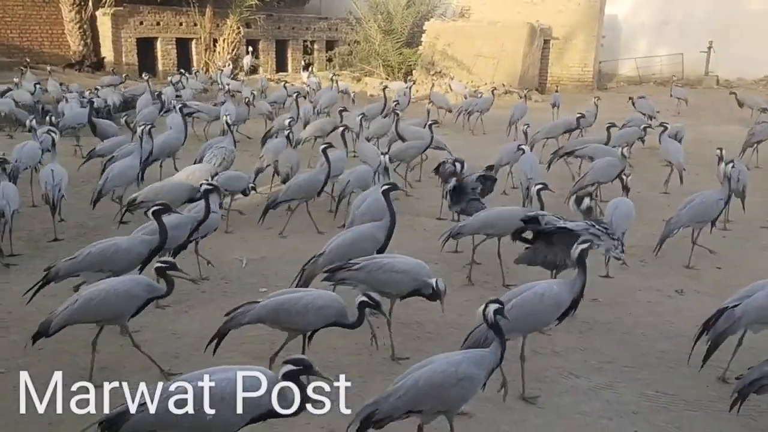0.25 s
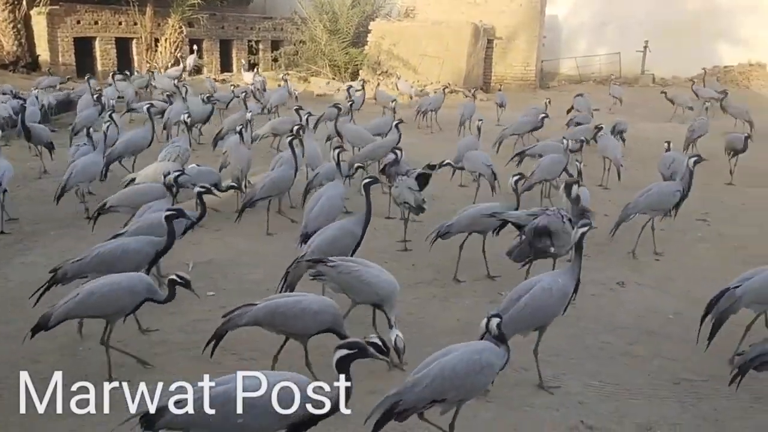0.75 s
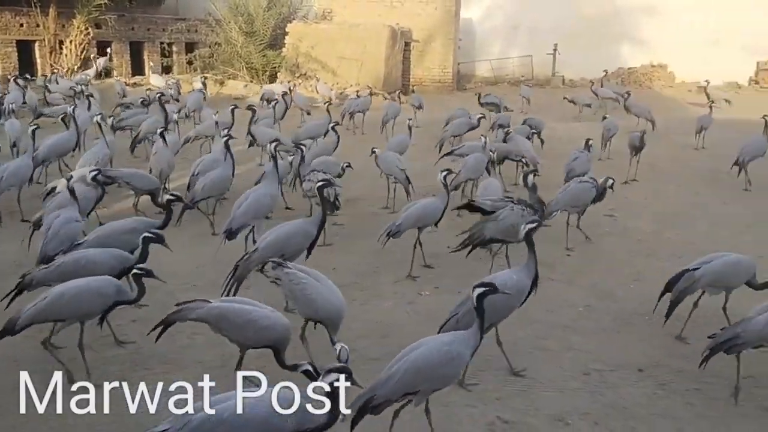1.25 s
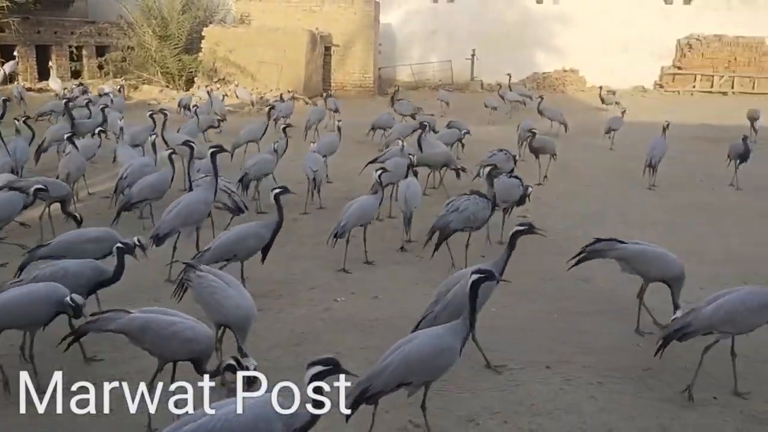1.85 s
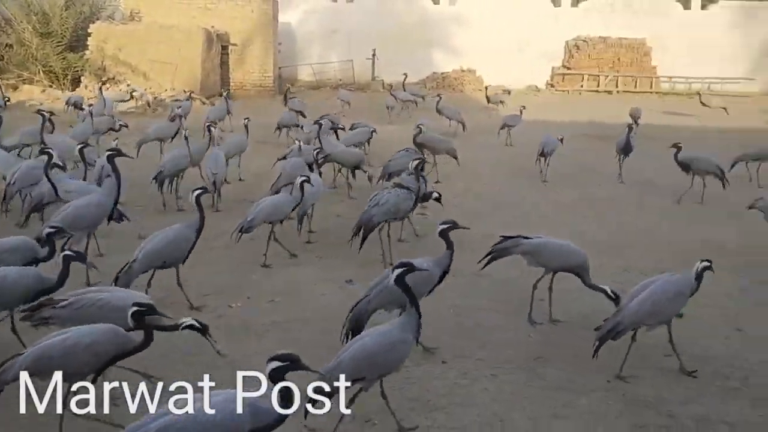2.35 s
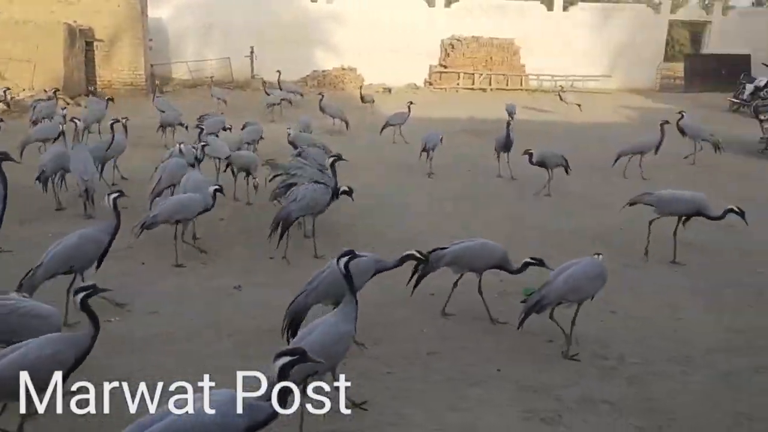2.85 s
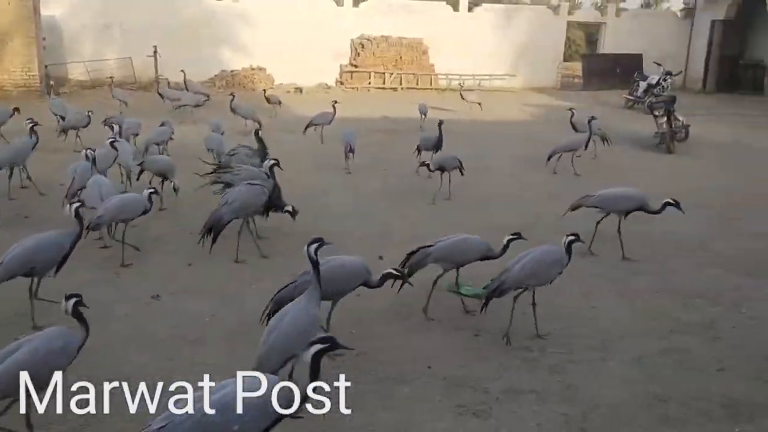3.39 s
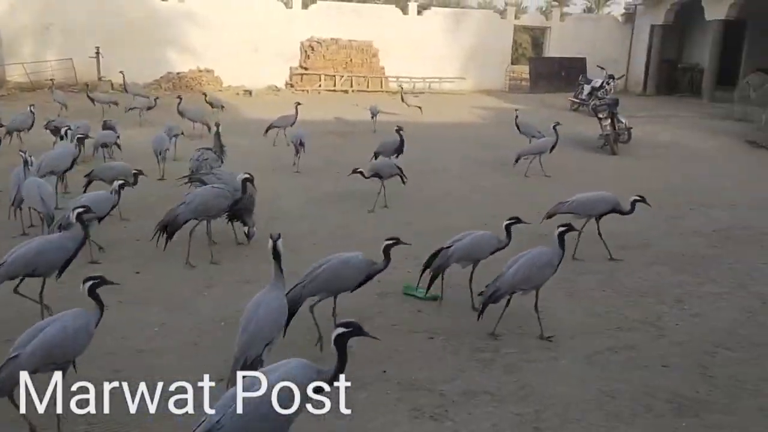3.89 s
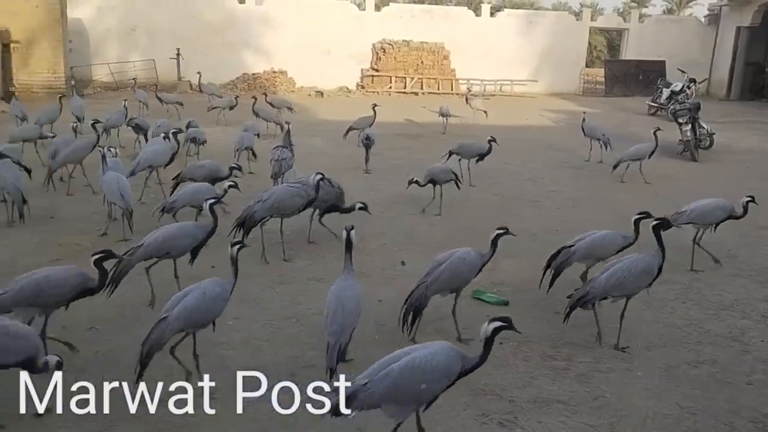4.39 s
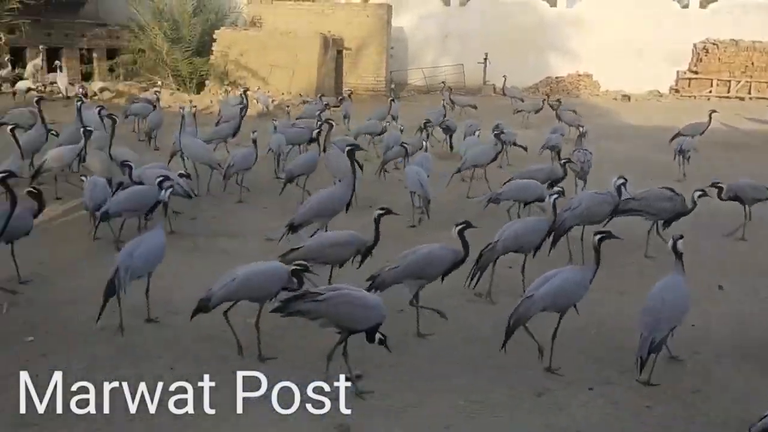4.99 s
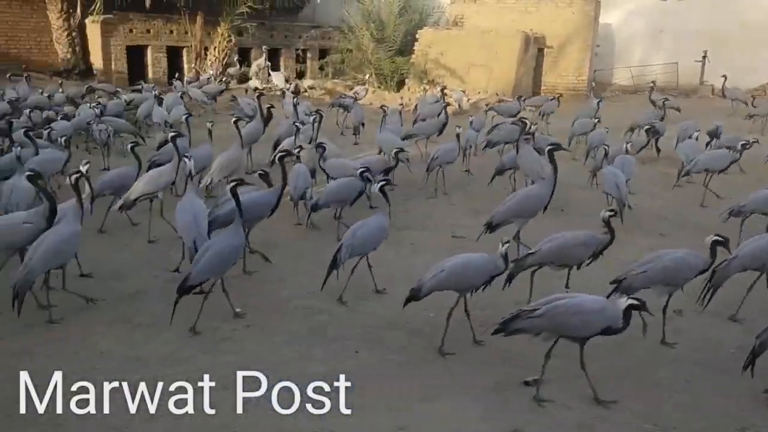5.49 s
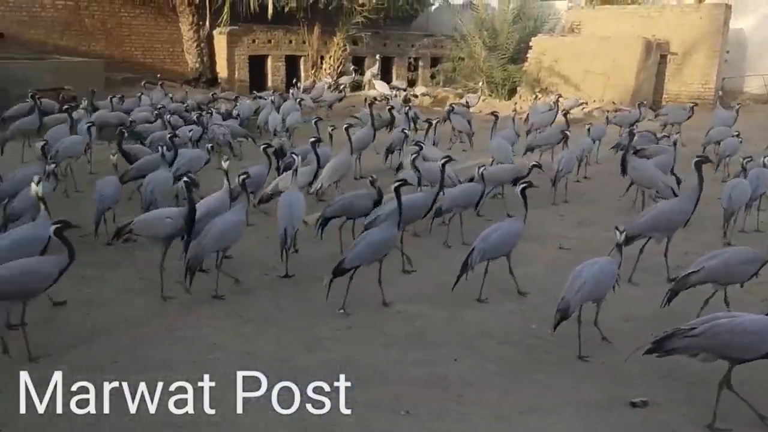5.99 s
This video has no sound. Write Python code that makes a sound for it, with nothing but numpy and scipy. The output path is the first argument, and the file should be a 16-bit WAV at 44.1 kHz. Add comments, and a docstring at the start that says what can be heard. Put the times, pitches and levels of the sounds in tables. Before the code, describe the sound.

Continuous crane clamour, outdoors among walls. Nasal, reedy cries of a tenth to a third of a second follow one another, some lower and hollow, some higher and raspy. Stuttering barks, about thirty a second, break in from the nearest birds. The distant flock swells and thins behind them, over quiet low rustle of feet and wings. Close stereo pickup, birds mostly to the right, light diffuse echo.

```python
"""A walled earth courtyard, with a big flock of demoiselle cranes calling close to two microphones.
Each near cry is a gliding tone with overtones, chopped into a fast rattle by the puffs of the syrinx.
The nearest birds also stutter in short barks: bursts of the same voice that sag in pitch.
Dozens of random cries merge into a far chorus; noise makes the low shuffle of the yard.
The walls answer the near birds with a decaying diffuse tail."""
import sys
import numpy as np
from scipy import signal
from scipy.fft import rfft, irfft, next_fast_len
from scipy.io import wavfile
from scipy.ndimage import uniform_filter1d, minimum_filter1d, map_coordinates

SR = 44100
rng = np.random.default_rng(int(sys.argv[2]) if len(sys.argv) > 2 else 0)


def wrap_up_sound(samples):
    """Save the sound to the file named by the first command line argument, as 16-bit audio."""
    columns = np.atleast_2d(samples).T
    # keep every value between -1 and 1, then stretch to whole-number steps
    tamed = np.clip(columns, -1, 1)
    steps = np.round(tamed * 32767).astype(np.int16)
    wavfile.write(sys.argv[1], SR, steps)


N = 275184


def amp(db):
    """Decibels to gain."""
    return 10 ** (np.asarray(db) / 20)


def unit(x):
    """Scale to rms 1."""
    return x / np.sqrt(np.mean(x ** 2) + 1e-20)


def along(points, hz):
    """(Hz, value) points read on a log frequency axis."""
    point_hz, value = np.transpose(points)
    return np.interp(np.log(hz + 1), np.log(point_hz + 1), value)


def curve(rows):
    """(s, value) rows as one value per sample."""
    return np.interp(np.arange(N) / SR, *np.transpose(rows))


def wobble(n, rate_hz):
    """Smooth random curve of n samples, rate_hz knots a second."""
    knots = rng.standard_normal(int(n * rate_hz / SR) + 4)
    return map_coordinates(knots, [np.arange(n) * rate_hz / SR + 1])


def filtered(x, response):
    """x times a response of frequency."""
    n = x.shape[-1]
    m = next_fast_len(n + 512)
    spectrum = rfft(x, m) * response(np.fft.rfftfreq(m, 1 / SR))
    return irfft(spectrum, m)[..., :n]


def coloured(x, points):
    """x through a (Hz, dB) spectrum, at rms 1."""
    return unit(filtered(x, lambda hz: amp(along(points, hz))))


# Low tones reach the two microphones more nearly together.
# Each row: frequency in Hz, share of the nominal lag.
LAG_SHARE_BY_HZ = [(750, 0.77), (1250, 0.98), (2200, 1.074), (5000, 1.054)]


def add(out, sound, start_s, lag_ms, ground_gain=.25):
    """Place a sound and its ground bounce; its bearing sets the lag of the left microphone behind the right."""
    bounce_s = rng.uniform(0.00218, 0.009)

    def response(hz):
        bounce = 1 + ground_gain * np.exp(-2j * np.pi * hz * bounce_s)
        lag_s = along(LAG_SHARE_BY_HZ, hz) * lag_ms / 1000
        # half the lag each way: left later, right earlier
        return bounce * np.exp(np.outer([-1, 1], 1j * np.pi * hz * lag_s))

    pair = filtered(sound, response)
    start = round(start_s * SR)
    pair = pair[:, max(-start, 0):max(N - start, 0)]
    out[:, max(start, 0):][:, :pair.shape[1]] += pair


def syrinx(pitch_hz, rough, rattle_hz=122, puff_decay_cycles=0.545, chirp=.1, shimmer_db=4, catch_db=2):
    """Phase and strength of the membranes' vibration, which comes in nearly regular rattling puffs."""
    scatter, jitter, tremble, waver = .22, .038, .008, .014
    n = len(pitch_hz)
    rate_hz = rattle_hz * np.exp(.1 * rng.normal() + scatter * rough ** 2 * wobble(n, 89.55))
    cycle = np.cumsum(rate_hz) / SR % 1
    puff = unit((1 - np.exp(-cycle / 0.1533)) * np.exp(-cycle / puff_decay_cycles) * (1 - cycle ** 4))
    depth = min(1, 2.198 * rough)
    flicker_db = shimmer_db * rough * wobble(n, 248.4) + catch_db * wobble(n, 70.4)
    strength = unit((1 - depth + depth * puff) * amp(flicker_db))
    # pitch rides on the pressure of each puff
    bend = chirp * depth * (puff - 1.1)
    # jitter grows with roughness
    bend += jitter * rough ** 2 * wobble(n, 597.8)
    bend += tremble * wobble(n, 129.0) + waver * wobble(n, 44.96)
    return 2 * np.pi * np.cumsum(pitch_hz * (1 + bend)) / SR, strength


# Pass band of the long windpipe. Each row: frequency in Hz, relative level in dB.
WINDPIPE_DB = [(400, -30), (700, -4.5), (850, -25), (1050, -31), (1400, 11), (1700, 12), (2200, -2),
               (2500, -47), (2800, -11), (3200, -3), (4000, -26)]
# Tone filter of the beak. Each row: frequency in Hz, gain in dB.
BEAK_DB = [(60, -80), (250, -56), (450, -18.5), (620, -5.5), (780, -6), (2500, -2.5), (2900, -10.5),
           (3250, -31), (4000, -0.5), (8000, -13)]
# Spectrum of the rasp. Each row: frequency in Hz, relative level in dB.
RASP_DB = [(2000, -100), (2900, -7), (3300, -11), (3650, -9), (4300, -7.5), (5100, -7.5), (6000, -14.5),
           (7000, -17.5), (8000, -28), (10000, -43.5)]
# Spectrum of the hiss. Each row: frequency in Hz, relative level in dB.
HISS_DB = [(5000, -46), (6500, 7), (7800, -4.5), (9200, -2.5), (10500, 1), (13000, -3.5), (16000, -14)]


def voice(effort, pitch_hz, rough, levels_db, spike=0.31, uneven_db=3):
    """Three harmonics and a croak of air, with rasp and hiss growing faster with effort, all chopped by the syrinx."""
    croak_db, brighten, rasp_noise = -14, 1.5, 1.2
    *harmonics_db, rasp_db, hiss_db = levels_db
    phase, strength = syrinx(pitch_hz, rough)
    air = rng.standard_normal(len(pitch_hz))

    def harmonic(k):
        return np.sin(k * phase + rng.uniform(0, 2 * np.pi))

    tone = sum(amp(db) * harmonic(k) for k, db in enumerate(harmonics_db, 1))
    # in a harsh voice each puff also rings the windpipe
    croak = rough * amp(max(harmonics_db) + croak_db) * coloured(air, WINDPIPE_DB)
    tone = np.sqrt(2) * effort * strength * (tone + croak)
    tone = filtered(tone, lambda hz: amp(along(BEAK_DB, hz)))
    overtones = unit(sum(amp(uneven_db * rng.normal()) * harmonic(k) for k in range(3, 12)))
    pulsed_air = rasp_noise * air * (1 + .5 * np.cos(phase))
    chop = strength ** spike
    rasp = coloured(chop * (overtones + pulsed_air), RASP_DB)
    hiss = coloured(chop * air, HISS_DB)
    return tone + effort ** brighten * (amp(rasp_db) * rasp + amp(hiss_db) * hiss)


def cry(length_s, pitches_hz, rough, levels_db, hiss_below_rasp_db=15):
    """One call: it swells and fades while its pitch follows a parabola through three points."""
    u = np.linspace(0, 1, round(max(length_s, .03) * SR))
    pitch_hz = np.polyval(np.polyfit([0, .5, 1], pitches_hz, 2), u)
    effort = np.sqrt(np.abs(np.sin(np.pi * u)))
    return voice(effort, pitch_hz, rough, [*levels_db, levels_db[-1] - hiss_below_rasp_db])


# Cries of the close birds. Each row: start in seconds, end in seconds, pitch in Hz at the start,
# middle and end, roughness 0-1, level in dB of harmonics 1, 2 and 3, rasp in dB, nominal left lag in ms.
NEAR_CRIES = [(-.07, 0.117, 1560, 1530, 1124, 0.3, -15.5, -20.5, -54, -33, 0.52),
              (.094, 0.327, 853, 820, 787, 0.56, -26, -13, -27.5, -46, 0.27),
              (0.099, 0.248, 1377, 1273, 1114, 0.99, -18.5, -21, -44, -36.5, 0.58),
              (0.278, 0.42, 1242, 1229, 1110, .25, -15, -20.5, -32, -41, 0.29),
              (.389, .62, 1046, 1106, 1041, 0.93, -11, -16.5, -7.5, -29, 0.47),
              (.391, .563, 798.6, 856.5, 786, 0.83, -13.5, -12.5, -19.5, -27, 0.43),
              (.551, 0.673, 822, 784, 807, 0.28, -20, -21.5, -27, -37.5, 0),
              (.656, 0.813, 895, 884, 760, 0.16, -17, -35, -47, -48.5, .02),
              (0.672, 0.794, 1133, 1140, 960, 0.41, -20, -42, -42, -63, 0.71),
              (.759, 0.93, 771, 784, 780, 0.16, -34, -12, -36, -56, .32),
              (0.803, 0.9, 985, 985, 944, 0.22, -40, -17.5, -43, -50, 0.6),
              (0.822, 0.932, 1149, 1268, 1220, .4, -51, -24.5, -38, -42, .02),
              (1.055, 1.131, 1350, 1259, 1185, 0.51, -17, -28, -58, -35.5, 0.31),
              (1.155, 1.22, 804, 768, 752, .25, -16, -14.5, -28, -30.5, 0.23),
              (1.227, 1.354, 1392, 1347, 1169, 0.59, -9.5, -22, -46, -34, 0.43),
              (1.33, 1.459, 899, 832, 758, .55, -21, -18, -32.5, -32, 0.46),
              (1.431, 1.51, 760, 769, 735, .6, -19, -16, -20.5, -31, 0.46),
              (1.449, 1.695, 1005, 955, 860, 0.73, -21, -49, -56, -42, 0.45),
              (1.729, 1.928, 1071, 1178, 1088, 0.53, -10.5, -13.5, -27, -34.5, .48),
              (1.908, 2.027, 1248, 1327, 1297, 0.78, -14, -22.5, -35.5, -36, .25),
              (1.928, 2.053, 740, 749, 812, 0.16, -20.5, -24, -23, -46, 0),
              (1.97, 2.076, 1650, 1632, 1593, 0.084, -17.5, -36, -48, -61, 0.18),
              (2.048, 2.268, 1145, 1075, 1006, .85, -25.5, -28, -50, -34, -.1),
              (2.277, 2.441, 1096, 1081, 923, 0.73, -9, -18, -28, -33.5, 0.53),
              (2.421, 2.716, 880, 856.4, 831, 0.67, -19.5, -20.5, -33, -32, 0.46),
              (2.698, 2.829, 910, 885, 877, 0.247, -51, -25.5, -29.5, -55, 0.4),
              (2.791, 3.072, 1230, 1168, 1046, 0.69, -13.5, -16, -53, -33, 0.52),
              (3.017, 3.158, 926, 832, 740, 0.57, -28, -16.5, -33, -31.5, .54),
              (3.141, 3.26, 736, 785, 753, 0.21, -25, -16, -22.5, -29.5, 0.45),
              (3.165, 3.328, 1422, 1339, 1077, 0.73, -8, -10.5, -45, -30.5, 0.58),
              (3.291, 3.433, 1343, 1302, 1214, 0.91, -10.5, -19.5, -57, -37.5, 0.47),
              (3.404, 3.618, 1148, 1218, 1115, 0.38, -11.5, -20, -39, -32.5, 0.6),
              (3.574, 3.671, 750, 788, 825, 0.3, -19.5, -25, -20, -29.5, 0.32),
              (3.667, 3.774, 812, 798, 700, 0.23, -17, -28, -32, -36.5, 0.36),
              (3.875, 4.021, 782, 799.4, 746, 0.42, -20, -13.5, -18.5, -34.5, 0.53),
              (3.979, 4.158, 1029, 1083, 1110, 0.96, -16.5, -21.5, -15, -37, 0.34),
              (4.018, 4.17, 817.5, 790, 712, 0.3, -24, -22.5, -21.5, -35.5, 0.22),
              (4.056, 4.14, 443, 393, 392, 0.086, -16.5, -40, -50, -60, 0.6),
              (4.28, 4.529, 1121, 1139, 1116, 0.77, -22, -22, -40, -33, 0.54),
              (4.39, 4.554, 932, 903, 860, 0.49, -26.5, -29, -42, -35.5, 0.37),
              (4.508, 4.682, 948, 982, 928, 0.79, -23, -20.5, -39, -32, 0.583),
              (4.529, 4.699, 1330, 1365, 1237, 0.73, -17, -27, -34, -53, 0.53),
              (4.629, 4.829, 1039, 1092, 1022, 0.231, -12.5, -27, -42, -28, 0.585),
              (4.66, 4.795, 1150, 1152, 1104, 0.433, -14, -16.5, -42, -25.5, 0.542),
              (4.691, 4.868, 1030, 1022, 963, 0.86, -41, -19.5, -28, -31.5, 0.45),
              (4.779, 4.902, 1303, 1283, 1240, 0.37, -14, -16.5, -49, -25.5, 0.49),
              (4.869, 5.0, 1203, 1189, 1120, 0.72, -17.5, -18.5, -45, -30, .5),
              (4.891, 5.073, 788, 751, 778, 0.339, -25, -16, -33, -36, 0.43),
              (5.06, 5.197, 944, 862.6, 816, 0.68, -21, -12.5, -23.5, -33, 0.27),
              (5.066, 5.198, 1270, 1322, 1260, 0.66, -23.5, -20, -37, -34, .41),
              (5.191, 5.288, 741.4, 790.6, 836, 0.37, -19, -10, -24, -31, 0.42),
              (5.341, 5.418, 831, 797, 760, 0.22, -16.5, -19.5, -35, -35, 0.46),
              (5.4, 5.55, 789, 770, 752, 0.26, -35.5, -39, -34.5, -46, -0.34),
              (5.688, 5.788, 779, 801, 762, 0.71, -19, -16.5, -25, -25.5, 0.34),
              (5.711, 5.884, 1146, 1151, 1050, 0.89, -12.5, -19.5, -28, -27, 0.48),
              (5.85, 6.027, 1031, 1013, 959, 0.61, -18.5, -25, -39, -34, 0.51),
              (6.02, 6.142, 1185, 1325, 1380, 0.29, -10.5, -16.5, -52, -43, .24),
              (6.04, 6.263, 1117, 1145, 1100, 0.58, -19, -17.5, -45, -36.5, 0.53),
              (6.146, 6.299, 1359, 1323, 1263, 0.66, -7, -19.5, -48, -32.5, 0.26),
              (6.159, 6.299, 890, 852, 843, 0.53, -44, -23, -32, -34.5, 0.54)]


def near_cries(stutter_hz=31, stutter_db=5.0):
    """The close birds: each cry breaks into beats more and more as it runs out, and ends in a dip."""
    out = np.zeros((2, N))
    for start_s, end_s, first_hz, middle_hz, last_hz, rough, *levels_db, lag_ms in NEAR_CRIES:
        sound = cry(end_s - start_s, [first_hz, middle_hz, last_hz], np.clip(rough, .1, 1), levels_db)
        t = np.arange(len(sound)) / SR
        beat = np.cos(2 * np.pi * stutter_hz * (t[-1] - t))
        stutter = amp(-stutter_db * t / t[-1] * beat)
        add(out, sound * unit(stutter), start_s, lag_ms)
    return out


def third_db(pitch_hz):
    """Third harmonic against the second: the windpipe passes it well only in a low voice."""
    return -9 if 3 * pitch_hz < 2900 else -24


# Level of the far birds. Each row: time in seconds, level in dB.
CHORUS_DB = [(0, -22), (1.4, -21.5), (1.7, -38), (1.85, -21), (2.0, -24.5), (2.55, -22.5), (2.75, -38.5),
             (3.0, -23.5), (3.55, -25.5), (3.8, -43), (4.05, -19), (4.28, -38), (4.55, -20), (5.15, -22.5),
             (5.45, -29.5), (5.65, -25.5), (6.24, -16.5)]


def far_flock(count=80, lowest_hz=780, highest_hz=1400, gain_db=0.0):
    """Many more birds cry at scattered times, each with a random pitch, harshness and bearing."""
    out = np.zeros((2, N))
    for i, (when, length, height, rough, bearing) in enumerate(rng.random((count, 5))):
        pitch_hz = lowest_hz * (highest_hz / lowest_hz) ** height
        glide_hz = pitch_hz * np.array([.98, 1.04, .9])
        levels_db = [0, -4, third_db(pitch_hz) - 4, -20]
        sound = cry(.12 + .14 * length, glide_hz, .36 + .4 * rough, levels_db)
        start_s = (i + when) / count * (N / SR + .2) - .2
        add(out, sound, start_s, .55 - 1.024 * bearing ** 2)
    return amp(curve(CHORUS_DB) + gain_db) * unit(out)


# Spectrum of the shuffle. Each row: frequency in Hz, relative level in dB per Hz.
RUMBLE_DB = [(15, -56), (25, -38), (54, -18), (141, 0.5), (184, 4.5), (211, 4.5), (317, -6), (400, -3),
             (520, -1), (880, -120)]
# Course of the shuffle. Each row: time in seconds, level in dB before the yard gain.
YARD_DB = [(0.0, -49.5), (0.76, -47.5), (1.79, -60.5), (2.4, -49), (3.02, -58), (3.35, -47.5), (3.5, -62),
           (4.01, -59), (4.1, -46), (4.27, -73), (4.41, -52), (6.24, -49)]


def yard(gain_db=-2.0, width=0.27, lumpy_db=2.5):
    """Low shuffle of feet, wings and air: coloured noise of unsteady level."""
    mid, side = coloured(rng.standard_normal((2, N)), RUMBLE_DB)
    level = amp(curve(YARD_DB) + gain_db + lumpy_db * wobble(N, 22))
    return level * np.array([mid + width * side, mid - width * side])


# Decay of the courtyard. Each row: frequency in Hz, time to fall 60 dB in seconds.
WALLS_T60_S = [(200, 0.52), (1500, 0.51), (5000, 0.26), (12000, 0.0047)]


def walls(x, delay_s=0.011):
    """The courtyard's diffuse answer: decaying noise, different at each microphone."""
    hz, t, z = signal.stft(rng.standard_normal((2, SR // 2)), SR, nperseg=256)
    decay = amp(-60 * t / along(WALLS_T60_S, hz)[:, None])
    tail = signal.istft(z * decay, SR, nperseg=256)[1]
    late = np.pad(x, ((0, 0), (round(delay_s * SR), 0)))
    return signal.fftconvolve(late, tail / np.linalg.norm(tail[0]), axes=1)[:, :N]


def bark(length_s, pitch_hz, levels_db, attack_s=0.0011, droop=0.0542, rough=0.56, rattle_after_s=0.017,
         ring=.1):
    """One syllable bursts open, sags in pitch and rings briefly; longer ones rattle, the shortest hardly."""
    t = np.arange(round(.06 * SR)) / SR
    fall = (1 - ring) * np.exp(-(t / length_s) ** 3) + ring * np.exp(-t / length_s)
    effort = (1 - np.exp(-t / attack_s)) * fall
    harshness = rough * min(1, length_s / rattle_after_s) ** 2
    sagging_hz = pitch_hz * (1 - droop * np.minimum(t / length_s, 2))
    return voice(effort, sagging_hz, harshness, levels_db)


# Barks of the nearest birds. Each row: start in seconds, decay length in seconds, pitch in Hz,
# level of harmonics 1 and 2 in dB, rasp in dB, levels before the bark gain.
NEAR_BARKS = [(.503, 0.023, 1116, -11, -15, -22), (.536, 0.015, 1126, -20, -15, -24),
              (.569, 0.014, 1055, -20, -16.5, -32), (.914, 0.01, 1537, -12.5, -21, -33),
              (.948, 0.0095, 1525, -9, -13, -30), (.981, 0.0079, 1490, -9.5, -11, -33),
              (1.013, 0.0075, 1487, -9, -10.5, -32.5), (1.046, 0.0048, 1400, -10.5, -22, -32),
              (1.117, 0.023, 942, -12.5, -12.5, -24.5), (1.159, 0.0047, 972, -9.5, -8, -19),
              (1.509, 0.024, 1093, -13, -18.5, -28.5), (1.54, 0.019, 1102, -17, -19, -30.5),
              (1.57, 0.01, 1097, -24, -16.5, -28), (1.604, 0.0087, 1095, -19, -14.5, -30.5),
              (1.636, 0.012, 1093, -34, -21, -34.5), (2.087, 0.022, 1373, -15, -16, -44),
              (2.12, 0.016, 1392, -16, -12.5, -34), (2.148, 0.019, 1355, -14.5, -13.5, -31.5),
              (2.179, 0.014, 1336, -15, -16, -40), (2.205, .013, 1325, -15, -14, -34),
              (2.446, 0.018, 926, -13.5, -13, -32), (2.474, .018, 905, -8, -9.5, -21.5),
              (2.507, 0.019, 885, -14, -13, -25.5), (2.54, 0.02, 880, -13, -15, -26.5),
              (2.572, 0.016, 879, -24, -15, -35), (2.889, 0.027, 1210, -16.5, -26, -24),
              (2.92, 0.027, 1285, -19, -17.5, -21.5), (2.952, 0.029, 1188, -16.5, -18, -18.5),
              (3.142, 0.012, 1460, -7.5, -10, -30), (3.662, 0.022, 986, -10.5, -13, -26.5),
              (3.68, 0.0078, 1241, -25, -7, -29), (3.703, 0.013, 1223, -27, -10, -29.5),
              (3.845, 0.01, 810, -21, -22.5, -44), (3.882, .024, 799, -25.5, -16.5, -33),
              (4.143, 0.02, 1195, -16, -12.5, -26), (4.174, 0.02, 1299, -12, -14, -24),
              (4.203, 0.017, 1288, -9.5, -12.5, -21), (4.232, 0.017, 1169, -10, -9.5, -20),
              (4.263, 0.019, 1120, -26, -17.5, -31.5), (4.35, 0.031, 1059, -18, -17, -34),
              (4.592, 0.011, 1365, -1, -21, -24), (5.26, 0.021, 843, -15, -23, -21),
              (5.303, 0.014, 1057, -10, -8.5, -17), (5.345, .013, 896, -12, -17, -22.5),
              (5.545, 0.027, 1460, -23, -20.5, -36), (5.582, 0.029, 1456, -16.5, -17.5, -37),
              (5.619, 0.021, 1427, -14, -25, -35.5), (5.64, 0.021, 904, -16.5, -14.5, -33),
              (5.673, 0.02, 918, -13, -14.5, -35), (5.703, 0.019, 892, -12, -12.5, -37),
              (5.767, 0.022, 1170, -31, -22, -26.5), (5.796, 0.015, 1180, -27, -13, -24.5)]
# Each run of barks comes from one bird.
# Each row: first moment in seconds, hiss over the rasp in dB, nominal left lag in ms.
BARK_RUNS = [(.4, -5.5, 0.33), (.85, -10, 0.55), (1.08, -15, 0.19), (1.45, -41, 0.49), (2.0, -18, -0.061),
             (2.4, -21, 0.56), (2.8, -10.5, .1), (3.1, -16, 0.57), (3.86, -19, 0.57), (4.1, -3.5, 0.517),
             (4.3, -24, 0.495), (4.5, -23, -0.31), (5.2, -44, .49), (5.5, -0.5, 0.4), (5.74, -1.5, -0.13)]


def barks(gain_db=1.5):
    """The nearest birds stutter in runs of short barks, about thirty a second."""
    out = np.zeros((2, N))
    for start_s, length_s, pitch_hz, first_db, second_db, rasp_db in NEAR_BARKS:
        _, hiss_db, lag_ms = [run for run in BARK_RUNS if run[0] <= start_s][-1]
        levels_db = [first_db, second_db, second_db + third_db(pitch_hz), rasp_db, rasp_db + hiss_db]
        add(out, bark(length_s, pitch_hz, levels_db), start_s, lag_ms)
    return amp(gain_db) * out


def scene(walls_db=-16):
    """Near birds, their echo, the far flock and the yard."""
    near = near_cries() + barks()
    return near + amp(walls_db) * walls(near) + far_flock() + yard()


def limiter(x, size=353, ceiling=.88):
    """Gain ducks smoothly around any peak above the ceiling; size in samples."""
    needed = ceiling / np.maximum(np.abs(x).max(axis=0), ceiling)
    held = minimum_filter1d(needed, 2 * size + 1)
    return x * uniform_filter1d(uniform_filter1d(held, size), size)


# Colour of the two microphones, split evenly. Each row: frequency in Hz, left minus right in dB.
MICS_DB = [(380, -.5), (700, -.5), (1290, 3.5), (2380, 5), (4400, -2.5), (8120, -3), (15000, 2.5)]


def record(dry, top_hz=15850):
    """The two microphones colour the sound differently; peaks are limited and the top is cut off."""
    heard = filtered(dry, lambda hz: amp(np.outer([.5, -.5], along(MICS_DB, hz))))
    return filtered(limiter(heard), lambda hz: hz < top_hz)


dry = scene()
out = record(dry)
wrap_up_sound(out)
```